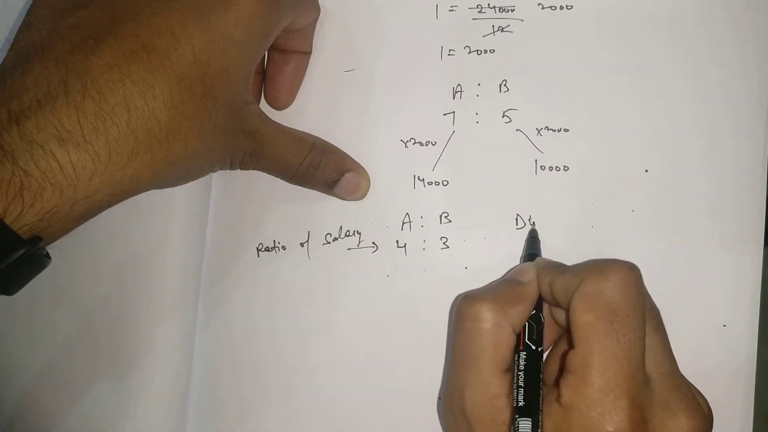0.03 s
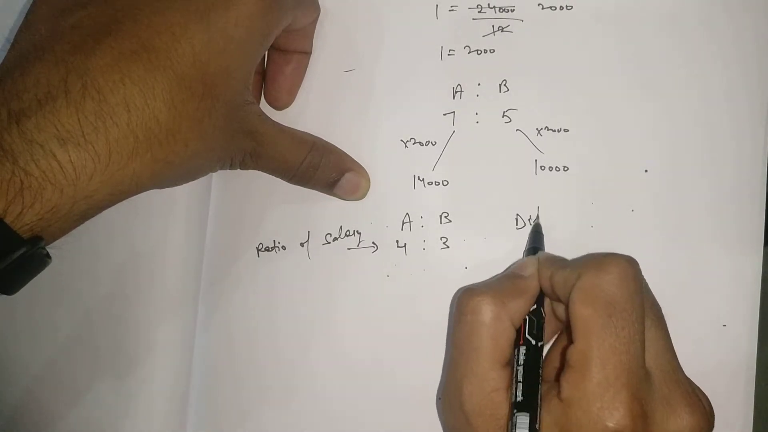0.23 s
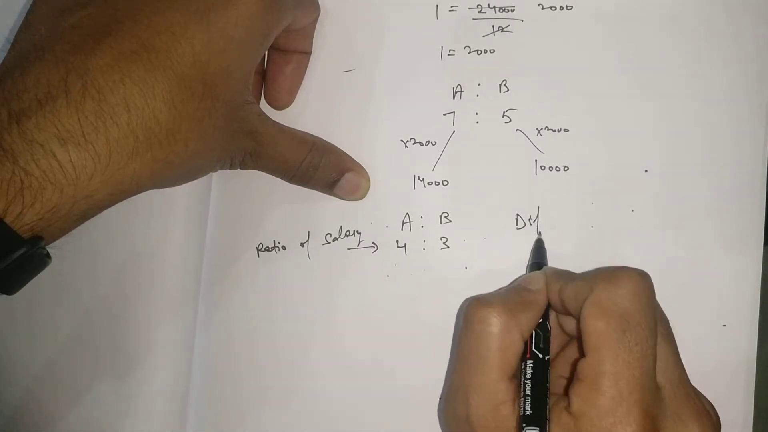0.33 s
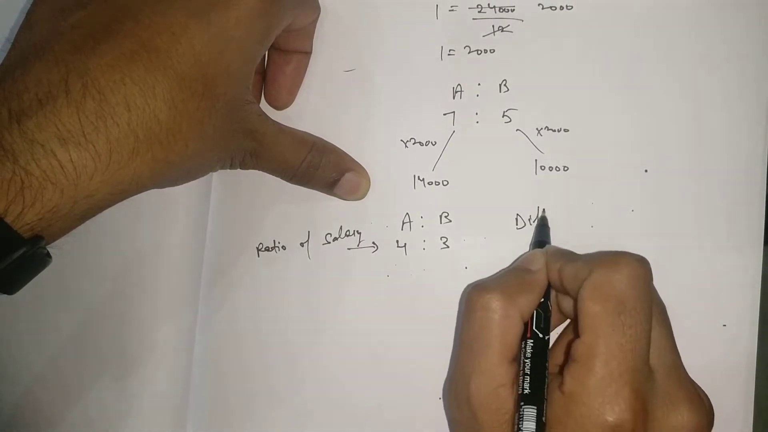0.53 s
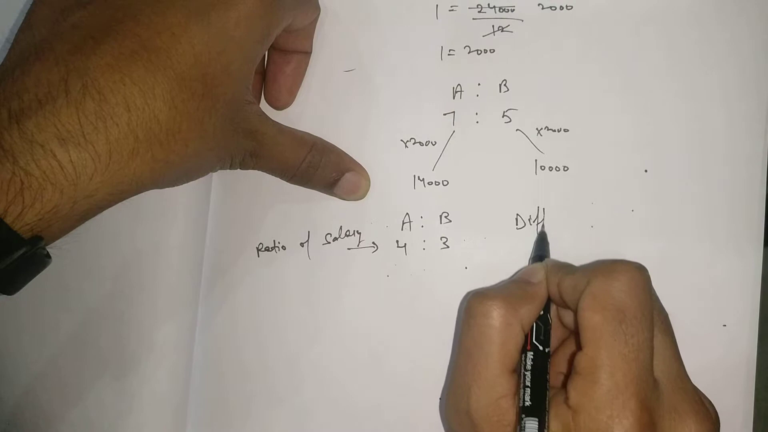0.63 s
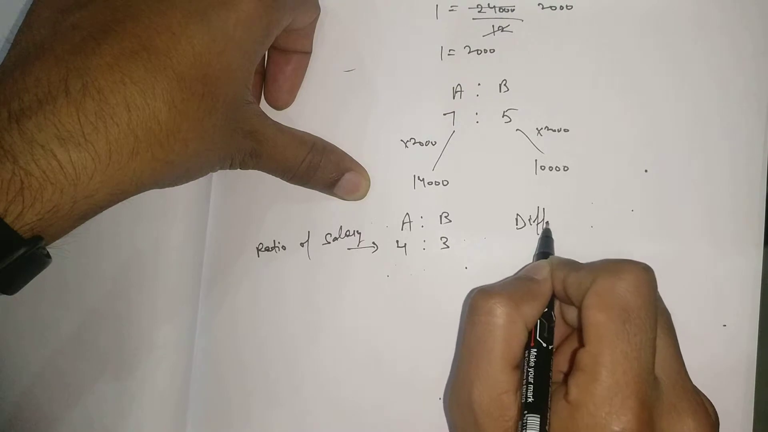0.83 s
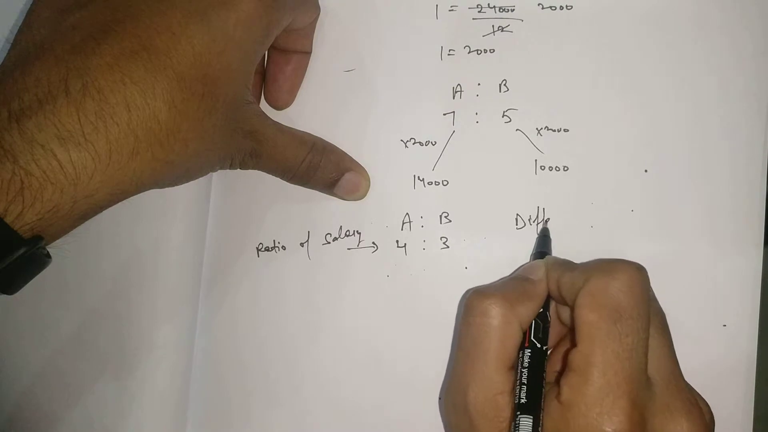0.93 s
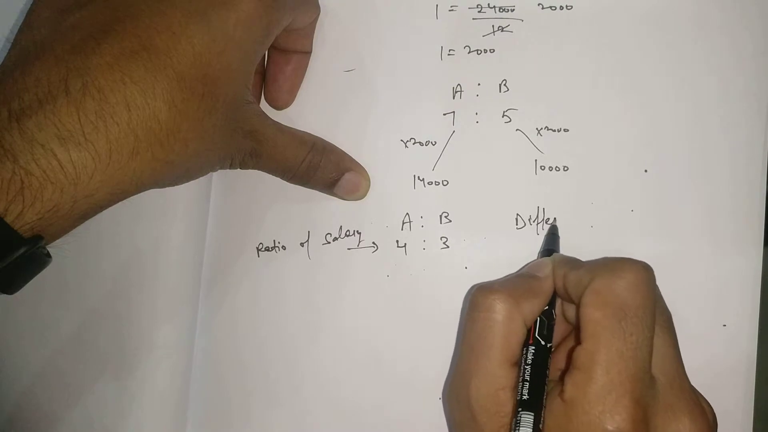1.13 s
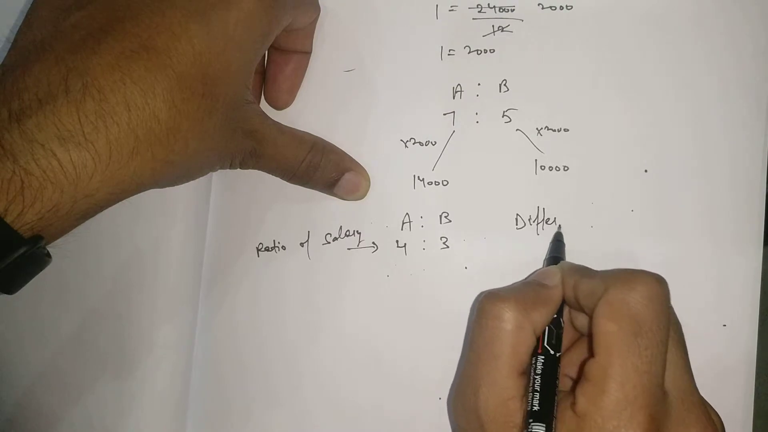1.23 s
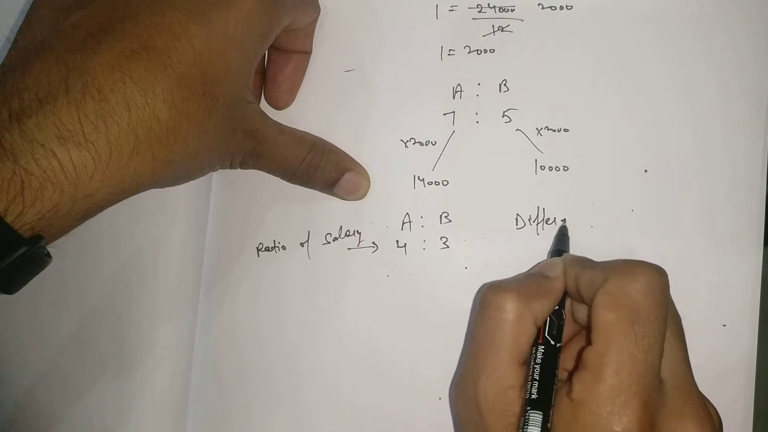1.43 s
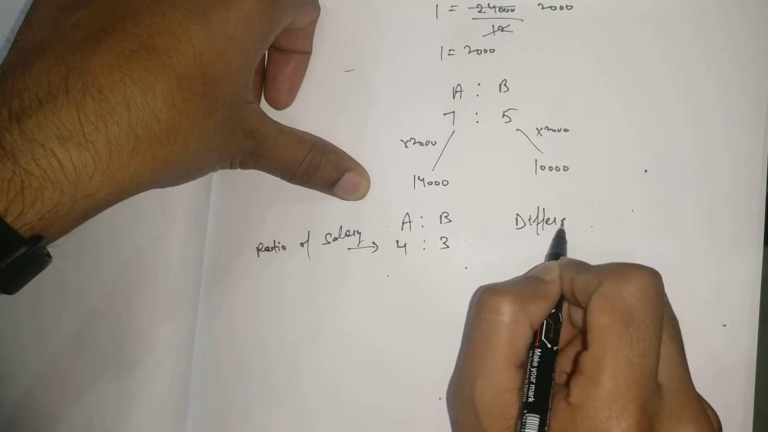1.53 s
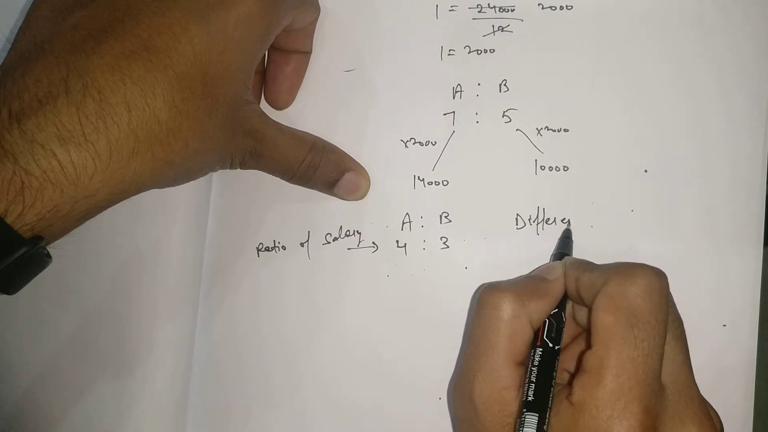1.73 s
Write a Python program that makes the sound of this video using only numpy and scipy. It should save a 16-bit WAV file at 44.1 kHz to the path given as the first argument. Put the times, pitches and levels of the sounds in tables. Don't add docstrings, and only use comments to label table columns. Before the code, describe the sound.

Low far explosions thud and rumble indoors, with light felt-tip pen strokes scraping on paper close by

```python
import sys
import numpy as np
from scipy import signal
from scipy.fft import rfft, irfft
from scipy.io import wavfile
from scipy.ndimage import uniform_filter1d

SR = 44100
rng = np.random.default_rng(int(sys.argv[2]) if len(sys.argv) > 2 else 0)


def boost(x):
    u = np.asarray(x, float) / 20
    return 10 ** u


def generate_wav(sig):
    pcm = np.round(np.clip(np.atleast_2d(sig).T, -1, 1) * 32767).astype(np.int16)
    wavfile.write(sys.argv[1], SR, pcm)


N = 79380


def evened(x):
    return x / np.sqrt(np.mean(x ** 2) + 1e-20)


def smooth_noise(shape, spans):
    noise = rng.standard_normal(shape)
    for span, axis in spans:
        noise = uniform_filter1d(noise, size=span, axis=axis)
    return noise


def read(points, hz):
    f, value = np.transpose(points)
    return np.interp(np.log(hz + 1), np.log(f + 1), value)


def ports(shared, unshared, colour, same, pan, phase=((1, 0), (2, 0))):
    hz = np.fft.rfftfreq(len(shared), 1 / SR)
    likeness = np.clip(read(same, hz), 0, 1)
    tilt_db = read(pan, hz) / 2
    z_shared, z_own = rfft(shared), rfft(unshared)
    left = z_shared * boost(tilt_db)
    delayed = z_shared * np.exp(-1j * read(phase, hz))
    right = (likeness * delayed + np.sqrt(1 - likeness ** 2) * z_own) * boost(-tilt_db)
    inside = (hz >= colour[0][0]) & (hz <= colour[-1][0])
    out = irfft(np.array([left, right]) * boost(read(colour, hz)) * inside, len(shared))
    return out / np.sqrt(np.mean(out.mean(0) ** 2) + 1e-20)


def pen():
    # (frequency [Hz], level [dB per Hz])
    scrape_colour = [(900, -12), (1500, -3.5), (2100, -1), (3000, -0.15), (3700, -0.5), (4300, -7.5),
                     (5800, -4), (6400, -19.5), (9000, -18)]
    hiss_colour = [(3500, -19.5), (4500, -5.5), (5900, -4), (6500, -3), (8600, -23.5), (10000, -13),
                   (12800, -9.5), (14300, -3.5), (16500, -6)]
    # (frequency [Hz], left-right likeness [0..1])
    pen_same = [(1200, .6), (2000, .96), (3500, .96), (6000, .8), (9000, .55), (15000, .55)]
    # (frequency [Hz], left minus right [dB])
    pen_pan = [(1200, 11), (2500, -2.2), (4200, 8), (5500, -1), (7000, 3), (10000, 30.5), (13500, 21.5),
               (15500, 15)]
    # (frequency [Hz], left lead [rad])
    pen_phase = [(1000, -.8), (2150, .2), (3530, -.2), (5340, .6), (6980, 3.0), (10400, 3.5), (15800, 9.)]
    tail_db, tail_t60_s = -13, 0.092

    low, high = pressure()
    shared, unshared = fibres(), fibres()
    body = patchy(np.array([sheet(shared), sheet(unshared)]))
    scrape = low * ports(*body, scrape_colour, pen_same, pen_pan, pen_phase)
    hiss = high * ports(shared, unshared, hiss_colour, pen_same, pen_pan, pen_phase)
    out = scrape + hiss + ticks()

    n = np.arange(8000)
    tail = rng.standard_normal((2, 8000)) * boost(-60 * n / SR / tail_t60_s)
    tail = tail * (n > 150)
    tail = tail / np.linalg.norm(tail[0])
    return out + boost(tail_db) * signal.fftconvolve(out, tail, axes=1)[:, :N]


def pressure():
    # (start [s], length [s], pressure level [dB], speed hiss [dB],
    # hiss lean [-1 early..1 late])
    full_strokes = [(.035, 0.11, -63, -6.5, -0.53), (.166, 0.086, -64.5, 2.5, 0.041),
                    (.392, 0.12, -64.5, 1.5, -0.1), (.544, 0.069, -65, 7, 0.4),
                    (.78, 0.066, -64.5, -4, 0.28), (.868, 0.041, -69.5, -4.5, -0.2),
                    (.962, 0.076, -65.5, 0, 0.14), (1.109, 0.066, -68, 2, 0.22),
                    (1.354, 0.054, -66, -15, -0.048), (1.437, 0.043, -67, -6, -0.24),
                    (1.528, 0.065, -66, -2, 0.19)]
    light_strokes = [(0.23, 0.061, -72.5, 0, -0.4), (0.359, 0.023, -76, 3, 0.041),
                     (0.6, 0.037, -74.5, 5, -0.27), (0.719, 0.017, -75, 4, -0.13),
                     (0.873, 0.14, -72.5, 3, 0.32), (1.275, 0.047, -80, -2, 0.12),
                     (1.4, 0.017, -77, -22, 0.1), (1.477, 0.058, -72, -4.5, 0.075),
                     (1.644, 0.045, -74.5, -9, 0.12), (1.74, 0.018, -68.5, -5, 0.19),
                     (1.781, 0.043, -74, -1, 0.16)]
    rise_s, fall_s = .003, .018
    hiss_stops_s = 0.011
    hump_db, lean_db = 5.5, 3.5

    t = np.arange(N) / SR
    low, high = np.zeros(N), np.zeros(N)
    for start, length, press_db, hiss_db, lean in list(full_strokes) + list(light_strokes):
        u = np.clip((t - start) / length, 0, 1)
        left_s = start + length - t
        edge = np.clip((t - start) / rise_s + .5, 0, 1) * np.clip(left_s / fall_s + .5, 0, 1)
        shape = np.sin(np.pi / 2 * edge) ** 2 * boost(hump_db * (np.sin(np.pi * u) - 1.11))
        slowing = np.clip((left_s - hiss_stops_s) / fall_s + .5, 0, 1)
        speed_db = press_db + hiss_db + lean_db * lean * (2 * u - 5.0)
        low += (shape * boost(press_db)) ** 2
        high += (shape * slowing * boost(speed_db)) ** 2
    return np.sqrt(low), np.sqrt(high)


def fibres():
    catches_per_s, spread_db, waver_db = 14000, 2, 0.83
    size = boost(spread_db * np.minimum(rng.exponential(1, N), 5)) * rng.standard_normal(N)
    waver = evened(smooth_noise(N, [(300, 0), (300, 0)]))
    caught = rng.random(N) < catches_per_s / SR
    return evened(size * caught * boost(waver_db * waver))


def ring(x, hz, width):
    r = np.exp(-np.pi * width / SR)
    return signal.lfilter([1 - r, 0, r - 1], [1, -2 * r * np.cos(2 * np.pi * hz / SR), r * r], x)


def sheet(friction):
    # (frequency [Hz], bandwidth [Hz], level [dB])
    paper_modes = [(2300, 700, 0), (3300, 900, 0), (5400, 800, 1)]
    ring_share = .35
    modes = sum(boost(mode_db) * ring(friction, hz, width) for hz, width, mode_db in paper_modes)
    return (1 - ring_share) * friction + ring_share * evened(modes)


def patchy(x):
    patch_db = 1.6
    z = signal.stft(x, nperseg=256)[2]
    field = evened(smooth_noise(z.shape[1:], [(4, 0), (8, 1)]))
    return evened(signal.istft(z * boost(patch_db * field), nperseg=256)[1][:, :N])


def ticks():
    # (time [s], peak level [dB], bright modes [dB], snap [dB])
    touches = [(.0366, -58, 1, -20), (.0612, -55, 2, -4), (.1662, -58, 0, -20), (.3591, -59, 5, -25),
               (.3636, -64, 8, -25), (.3674, -68, 8, -25), (.3965, -63, 4, -20), (.5457, -66, 0, -20),
               (.7217, -54, 4, -22), (.7272, -66, 7, -20), (.7295, -60, -6, -16), (.7322, -65, 7, -20),
               (.8694, -62, 0, -20), (1.2773, -52, 2, -25), (1.2875, -70, 6, -25), (1.2961, -54.5, 1, 0),
               (1.3285, -65, -10, -25), (1.4396, -64, 0, -20), (1.7434, -65, -3, -25)]
    # (frequency [Hz], level [dB], t60 [s])
    nib_modes = [(2250, 0, .008), (1370, -6, .01), (3300, -3, .004), (4400, 1, .004), (5300, 1, .005)]
    bright_hz, detune = 4000, .05
    right_lag_s, rise_s, snap_s = .00003, .0001, .00025

    out = np.zeros((2, N))
    t = np.arange(1500) / SR - np.array([[0], [right_lag_s]])
    tunes = 1 + detune * rng.uniform(-1, 1, (len(touches), len(nib_modes)))
    noises = rng.standard_normal((len(touches), 1500))
    for (start, peak_db, bright_db, snap_db), tune, noise in zip(touches, tunes, noises):
        rings = 0
        for (hz, mode_db, t60), k in zip(nib_modes, tune):
            decay = boost(mode_db + bright_db * (hz > bright_hz) - 60 * t / t60)
            rings = rings + decay * np.sin(2 * np.pi * hz * k * t)
        snap = np.diff(noise, 2, prepend=[0, 0]) * np.exp(-t[0] / snap_s)
        snap = snap * np.array([[1], [.3]])
        at = round(start * SR)
        out[:, at:at + 1500] += boost(peak_db) * (boost(snap_db) * snap - rings * np.clip(t / rise_s, 0, 1))
    return out


def blasts():
    # (time [s], level [dB], dulling [dB per octave])
    far_blasts = [
        (-.615, 5, -7),
        (.18, 1.5, 0),
        (1.0273, 0.5, 0),
    ]
    size = 2 * SR
    spectrum = rfft(boom())
    out = np.zeros((2, N + 3 * SR))
    octaves = np.log2(np.maximum(np.fft.rfftfreq(size, 1 / SR) / 60, 1))
    for start, blast_db, dull_db in far_blasts:
        at = round((start + 1) * SR)
        one = irfft(spectrum * boost(blast_db + dull_db * octaves))
        out[:, at:at + size] += one[:, :out.shape[1] - at]
    return out[:, SR:SR + N]


def boom():
    # (delay [s], rms level [dB], frequency [Hz], length [s])
    echoes = [(-.004, -55, 261, 0.023), (.014, -52.5, 170.5, 0.021), (0.032, -40, 62, 0.12),
              (.039, -40.5, 155, 0.057), (.038, -44.5, 238.7, 0.04), (0.04, -53, 305, 0.042),
              (.036, -42, 109, 0.026), (.085, -48.5, 218, 0.024), (.085, -42, 126, .03),
              (.122, -38, 119, 0.026), (.12, -49.5, 230, 0.045), (.15, -39, 154, 0.075),
              (.175, -49.5, 227, 0.025), (.19, -41, 64.7, 0.06), (.2, -46.5, 113.3, 0.052),
              (.24, -46.5, 151.3, 0.034), (.245, -44.5, 78.6, 0.067), (.245, -61.5, 249, 0.023),
              (.3, -60, 242, 0.042), (.35, -45, 79, .05), (.36, -53.5, 147, 0.041),
              (.33, -47.5, 100, 0.033), (.405, -48, 76, 0.035), (.42, -52.5, 106, 0.05),
              (.42, -57.5, 160, 0.062), (.44, -65, 196, 0.076), (.455, -48.5, 63, 0.07),
              (.52, -54, 73, 0.073), (.51, -59, 131, 0.074), (.585, -54, 61, 0.046),
              (.64, -56.5, 64, 0.048), (.66, -63.5, 177, 0.075), (.72, -60, 60, 0.063),
              (.775, -59, 65, 0.089), (.76, -62, 165, 0.038), (.037, -51, 135, 0.019), (.59, -60, 190, .05),
              (0.56, -69, 255, 0.048), (0.32, -49.5, 50.96, 0.049)]
    # (frequency [Hz], left minus right [dB])
    boom_pan = [(50, -2.5), (150, 1), (300, -1), (900, -3)]
    t = np.arange(2 * SR) / SR
    out = diffuse_roll(t, boom_pan)
    opposite = np.array([[1], [-1]])
    for (delay, echo_db, ring_hz, length), (turn, lean) in zip(echoes, rng.random((len(echoes), 2))):
        u = np.clip((t - delay) / length, 0, 3)
        swell = np.sin(np.pi * np.minimum(u / 1.3, 1) ** .55)
        side_db = read(boom_pan, ring_hz) / 2 * opposite
        skew = (lean - .5) * ring_hz / 600 * opposite
        loose = np.minimum(3 * abs(delay - .038), 1) * (turn - .5)
        cycles = ring_hz * (t - delay) + .5 + loose
        out += boost(echo_db + 4.0 + side_db) * swell * np.sin(2 * np.pi * cycles + skew)
    return out


def diffuse_roll(t, boom_pan):
    # (frequency [Hz], level [dB per Hz])
    roll_colour = [(30, -56), (55, -7.5), (110, -7), (240, -9.5), (330, -21), (420, -23.5), (1300, -35),
                   (1800, -41.5)]
    # (frequency [Hz], t60 [s])
    roll_t60 = [(50, 2.74), (150, 1.14), (300, 0.96), (420, 0.55), (1500, 0.5)]
    # (frequency [Hz], left-right likeness [0..1])
    boom_same = [(40, 0.97), (150, 0.81), (300, 0.71), (600, 0.5), (1500, 0.089)]
    roll_db, rise_s, bass_lag_s = -42.5, 0.019, 0.013

    noise = ports(*rng.standard_normal((2, len(t))), roll_colour, boom_same, boom_pan)
    hz, at, z = signal.stft(noise, SR, nperseg=512)
    hz = hz[:, None]
    decay = boost(-60 * at / read(roll_t60, hz))
    arrival = np.clip(at / bass_lag_s + hz / 250 - 1, 0, 1)
    roll = signal.istft(z * decay * arrival, SR, nperseg=512)[1][:, :len(t)]
    return boost(roll_db) * roll * np.clip(t / rise_s, 0, 1) ** 2


def room():
    # (frequency [Hz], level [dB per Hz])
    rumble_colour = [(28, -95), (40, -26), (57, -4), (90, -13.5), (150, -13.5), (260, -25.5), (400, -37),
                     (1300, -36.5)]
    air_colour = [(1300, 1.5), (2500, -0.2), (5800, -6.5), (6600, -12), (8500, -11.5), (11000, -7),
                  (14500, -4.5), (16500, 5)]
    # (frequency [Hz], left-right likeness [0..1])
    air_same = [(60, 0.95), (150, 0.94), (380, 0.54), (950, 0.052), (2400, 0.095), (3500, 0.093),
                (6000, 0.084), (15000, 0.075)]
    # (frequency [Hz], left minus right [dB])
    air_pan = [(60, 0.44), (180, -0.5), (550, -1.6), (1650, -0.26), (4970, -1.1), (9500, 3), (15000, 3)]
    rumble_db, air_db, lump_db = -59, -72.5, 1.2

    lump = boost(lump_db * evened(smooth_noise(N, [(2500, 0), (2500, 0)])))
    rumble = ports(*rng.standard_normal((2, N)), rumble_colour, air_same, air_pan)
    air = ports(*rng.standard_normal((2, N)), air_colour, air_same, air_pan)
    return rumble * boost(rumble_db) * lump + air * boost(air_db)


def scene():
    return pen() + blasts() + room()


def gate(x):
    from_hz, share, gate_db = 6000, .25, -25
    mid_side = np.array([x[0] + x[1], x[0] - x[1]]) / 2
    hz, _, z = signal.stft(mid_side, SR, nperseg=1024)
    chance = smooth_noise(z.shape, [(7, 1), (5, 2)])
    shut = (chance < np.quantile(chance, share)) & (hz[:, None] > from_hz)
    mid, side = signal.istft(z * boost(gate_db * shut), SR, nperseg=1024)[1][:, :N]
    return np.array([mid + side, mid - side])


def roll_off(x):
    return signal.sosfilt(signal.butter(12, 15830, fs=SR, output="sos"), x)


def record(dry):
    bass_cut = signal.butter(5, 42, "high", fs=SR, output="sos")
    finished = gate(signal.sosfilt(bass_cut, dry))
    return roll_off(finished)


dry = scene()
out = record(dry)
generate_wav(out)
```